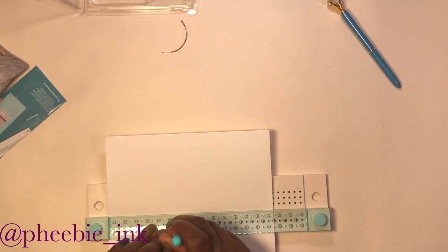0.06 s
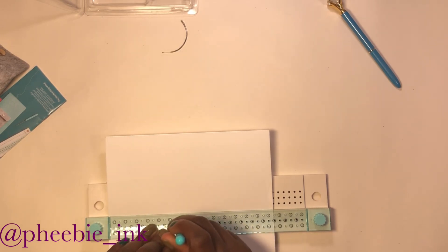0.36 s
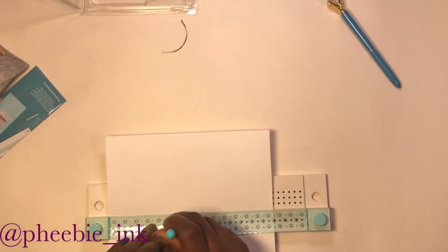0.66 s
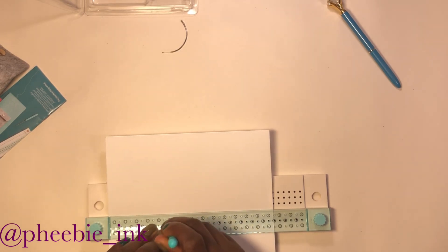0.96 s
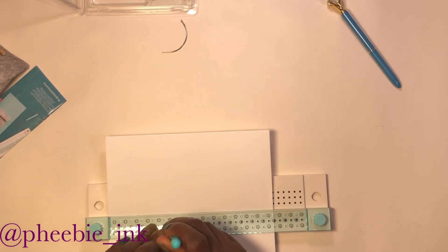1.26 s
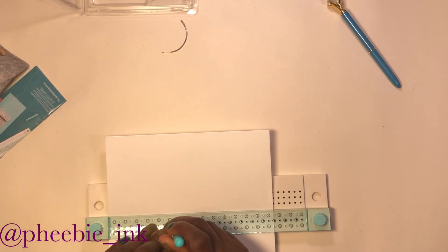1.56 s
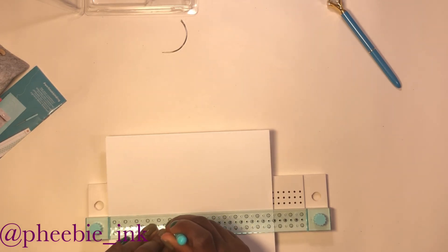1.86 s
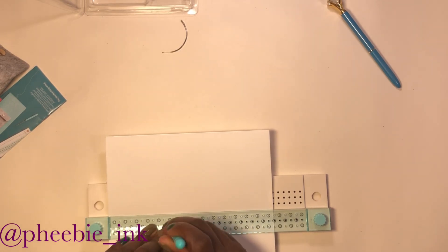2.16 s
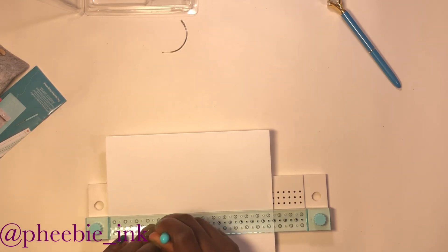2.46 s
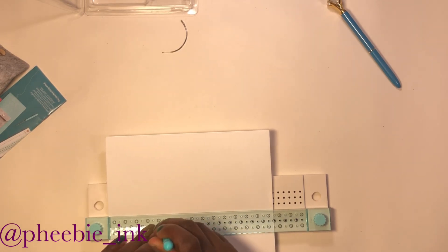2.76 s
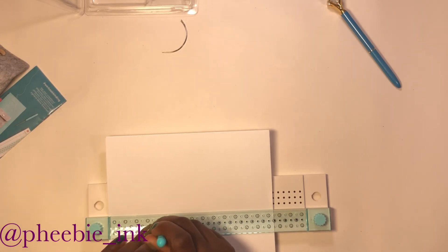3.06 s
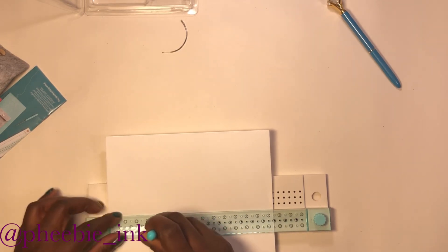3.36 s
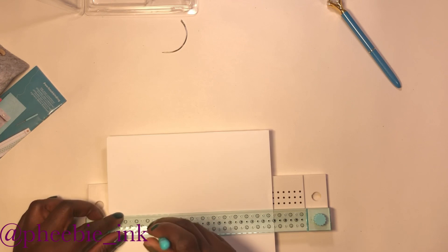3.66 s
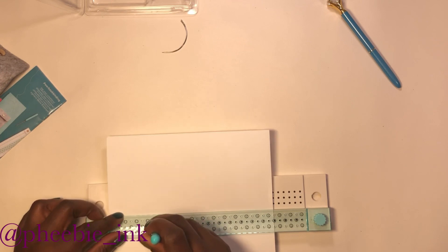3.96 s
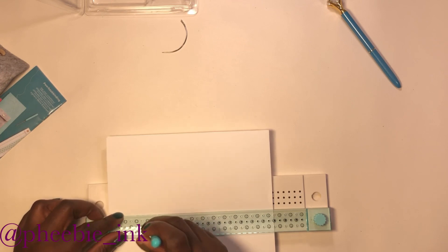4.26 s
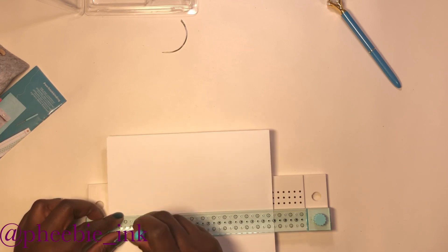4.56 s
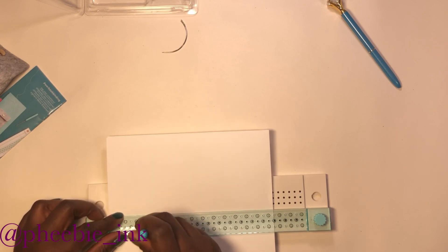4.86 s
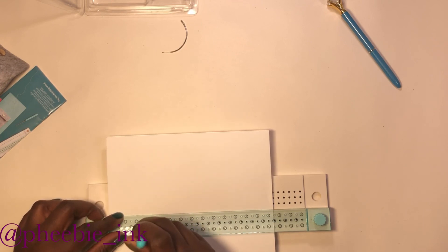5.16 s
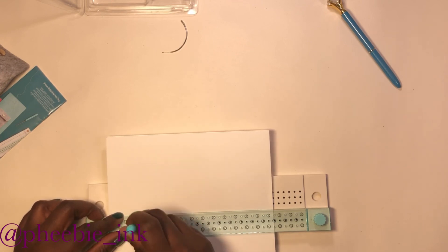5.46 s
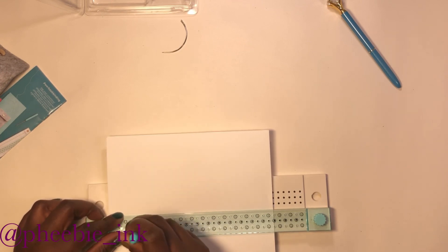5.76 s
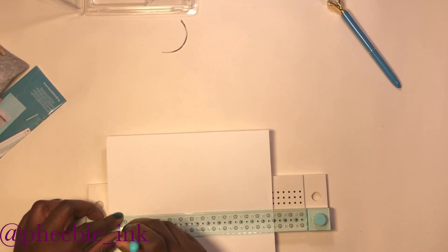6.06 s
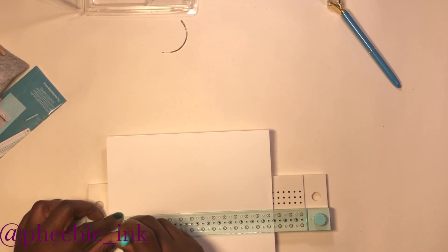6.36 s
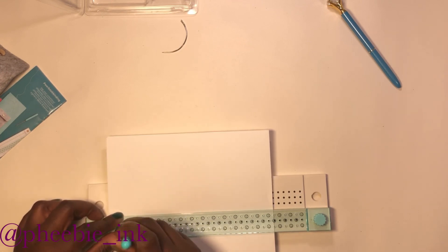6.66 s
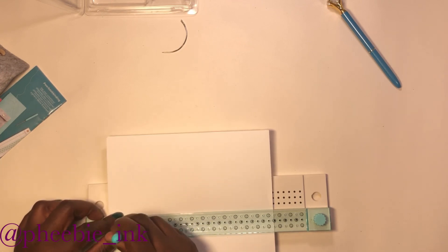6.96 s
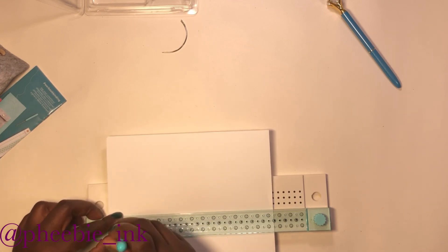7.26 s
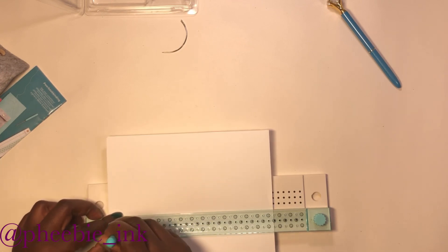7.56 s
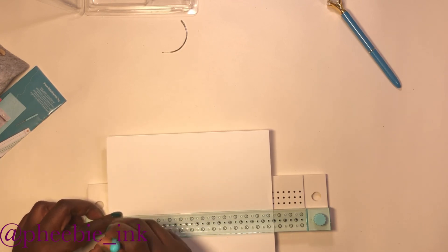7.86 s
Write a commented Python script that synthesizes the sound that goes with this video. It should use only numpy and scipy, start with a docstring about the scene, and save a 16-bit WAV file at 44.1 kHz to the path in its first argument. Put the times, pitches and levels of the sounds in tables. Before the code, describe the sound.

Close, dry clicks and quick paper crunches as an awl pierces sheets along a plastic hole guide, which sometimes slaps back down.

```python
"""Awl punching a paper stack

A table in a quiet room, heard close up on one microphone. An awl punches a row of holes, guided by a
plastic hole ruler. The steel point clacks into a guide hole, crunches through the sheets in two quick
pushes, thumps the table and rasps back out, or sticks and jerks free so that the ruler slaps down.
The hands shift softly over the paper."""
import sys
import numpy as np
from scipy import signal
from scipy.fft import rfft, irfft, next_fast_len
from scipy.io import wavfile
from scipy.ndimage import uniform_filter1d

SR = 44100
rng = np.random.default_rng(int(sys.argv[2]) if len(sys.argv) > 2 else 0)


def put_to_file(sound):
    """Save the sound as 16-bit audio at rate SR, in the file named by the first command-line argument."""
    columns = np.atleast_2d(sound).T  # one column per channel
    safe = np.clip(columns, -1, 1)
    whole_steps = np.round(safe * 32767)
    wavfile.write(sys.argv[1], SR, whole_steps.astype(np.int16))


N = 357651
STROKE = np.arange(-SR // 8, SR // 5) / SR  # time around the peak of one stroke, s
MIDDLING_KNOCK_DB = -38.5

# resonances of the plastic ruler: f/Hz, bandwidth/Hz, relative level/dB
RULER = [(570, 80, -13), (801, 76, -6), (1037, 78, -1.5), (1253, 129, 4.5), (1460, 156, 2),
         (1868, 70, -5.5), (2003, 160, -11), (2420, 240, -15.5), (2763, 180, -7), (3130, 860, -14),
         (3970, 1400, -20.5), (4700, 660, -23)]
# resonances of the punching board: f/Hz, bandwidth/Hz, relative level/dB
BOARD = [(61.7, 32, -5.5), (109.5, 6.9, 11), (150, 15.8, 1.5), (200.5, 62, -4.5), (256, 27, -1),
         (305, 19, 0.5), (387, 33, -6), (477, 94, -10), (606, 110, -10.5), (668, 66, -14.5)]
# crisp edge on the rasp of a withdrawing shaft: f/Hz, gain/dB
WITHDRAW_EDGE = [(11000, 0), (15000, 4.5)]


def from_db(db):
    """Decibels to gain."""
    return 10 ** (np.asarray(db) / 20)


def rms_one(x):
    """Scale to rms 1."""
    return x / np.sqrt(np.mean(x ** 2) + 1e-20)


def peak_one(x, size):
    """Scale so that the loudest stretch of size samples has rms 1."""
    return x / np.sqrt(uniform_filter1d(x ** 2, size).max() + 1e-20)


def add(out, s, sound):
    """Mix in a stroke with its time zero at s seconds."""
    start = round((s + STROKE[0]) * SR)
    low, high = max(start, 0), min(start + len(sound), N)
    out[low:high] += sound[low - start:high - start]


def colour(x, spectrum):
    """Shape a signal by a curve through (f/Hz, gain/dB) points."""
    size = next_fast_len(len(x))
    hz, db = np.transpose(spectrum)
    gain = from_db(np.interp(np.log(np.fft.rfftfreq(size, 1 / SR) + 1), np.log(hz), db))
    return irfft(rfft(x, size) * gain, size)[:len(x)]


def resonate(x, modes, hollow_db=0, bright_db=0, spread_db=1.8):
    """Parallel resonances, weighted anew by each point of contact."""
    out = 0
    for k, (hz, width, db) in enumerate(modes):
        r = np.exp(-np.pi * width / SR)
        ringing = signal.lfilter([1, 0, -1], [1, -2 * r * np.cos(2 * np.pi * hz / SR), r * r], x)
        register_db = hollow_db * (hz < 1350) + bright_db * (hz > 2400)
        gain = (-1) ** k * from_db(db + register_db + spread_db * rng.standard_normal())
        out = out + gain * (1 - r * r) / 2 * ringing
    return out


def swell(width_s, steepness, fade_s=0.055, lead_s=0):
    """Contact force builds to a peak and lets go again."""
    t = STROKE + lead_s
    return (1 + (t / width_s) ** 2) ** -steepness * np.exp(-(t / fade_s) ** 2)


def slips(spread_db):
    """Dense tiny slips and fibre breaks of uneven size; rms 1."""
    noise, sizes = rng.standard_normal((2, len(STROKE)))
    return rms_one(noise * from_db(spread_db * sizes))


def room_tone(air_db=-69, whine_hz=1990, whine_db=-90.5):
    """Room air with a faint steady whine."""
    # spectrum of the air: f/Hz, relative level/dB
    air_spectrum = [(20, -31), (45, -14.5), (62, 3), (80, -7.5), (105, 0.5), (190, -9), (280, -3),
                    (430, -11), (850, -17), (1500, -19), (2200, -22.5), (5000, -25.5), (11000, -29),
                    (15500, -29)]
    air = from_db(air_db) * rms_one(colour(rng.standard_normal(N), air_spectrum))
    return air + from_db(whine_db) * np.sin(2 * np.pi * whine_hz * np.arange(N) / SR)


def sliding_hands():
    """Skin sticks and slides on the paper in a soft, uneven hiss."""
    # course of the sliding: t/s, level/dB
    effort = [(0, -70.5), (.15, -65.5), (.3, -77), (1.7, -81), (2.2, -72.5), (2.45, -62.5), (2.85, -67),
              (3.1, -69.5), (3.45, -65), (3.75, -62.5), (3.9, -75.5), (4.4, -76.5), (4.65, -70),
              (4.9, -71.5), (6.5, -81), (8.1, -73)]
    # spectrum of skin on paper: f/Hz, relative level/dB
    skin = [(200, 19.5), (500, 17), (1400, 11.5), (2400, 6.5), (3300, 5), (5000, 1), (9000, -4.5),
            (15500, -6)]
    grip_db = rms_one(uniform_filter1d(uniform_filter1d(rng.standard_normal(N), 1500), 1500))
    effort_db = np.interp(np.arange(N) / SR, *np.transpose(effort))
    return from_db(effort_db + grip_db) * rms_one(colour(rng.standard_normal(N), skin))


def crackle(spectrum, ripple_db=5.0, mode_spacing_hz=170):
    """Breaking fibres, coloured by the sheet's many modes, which differ from hole to hole; rms 1."""
    mode_db = ripple_db * np.clip(rng.standard_normal(128), -2, 2)
    mode_hz = mode_spacing_hz * (1 + np.arange(len(mode_db)))
    fibres = colour(slips(2.8), spectrum)
    return rms_one(colour(fibres, np.transpose([mode_hz, mode_db])))


def rip(width_s, paper_db, coarse_db, squeak_hz, ruler_db, board_db=-51.5, squeak_db=4.5):
    """Fibres break; the shaft squeaks in the hole, rubs the ruler and shakes the board."""
    # spectrum of tearing paper: f/Hz, relative level/dB
    tearing = [(600, 2), (1500, 6), (2300, -1), (2900, 3), (3600, 2), (4500, 7.5), (5800, 3), (7500, 0.5),
               (11000, -1.5), (13000, -3), (14500, -1.5)]
    # spectrum of the shaft's friction on the ruler: f/Hz, relative level/dB
    rubbing = [(500, -15.5), (800, 1), (1150, -7), (1430, -1.5), (1750, -1), (3000, 0)]
    force = swell(width_s * 1.514, 1.424, fade_s=0.15)
    fibres = colour(crackle(tearing), [(3600, coarse_db), (6800, 0)])  # thick fibres crack lower
    fibres = colour(fibres, [(squeak_hz - 400, 0), (squeak_hz, squeak_db), (squeak_hz + 400, 0)])
    paper = from_db(paper_db) * fibres * force
    friction = colour(slips(2.2), rubbing) * force
    ruler = from_db(ruler_db) * peak_one(resonate(friction, RULER), size=700)
    board = from_db(board_db) * peak_one(resonate(slips(1.7) * force, BOARD), size=700)
    return paper + ruler + board


def thump(level_db, rise_s=0.0018, spread_db=2.5, detune=0.022, damp_s=0.33):
    """A soft push sets the low modes of the table swinging; the leaning hand detunes and damps them."""
    # modes of the table without the hand: f/Hz, relative level/dB, t60/s
    modes = [(31, -32.5, 0.29), (62, -12, 0.65), (108, 3.5, 0.27), (142.6, -14, 0.44), (216, -28.5, .2),
             (234.5, -12, 0.16), (298.5, -33.5, 0.25)]
    age = np.maximum(STROKE, 0)
    swing = 0
    for (hz, db, t60), (strength, load) in zip(modes, rng.standard_normal((len(modes), 2))):
        decay = from_db(db + spread_db * strength - 60 * age / t60)
        swing = swing + decay * np.sin(2 * np.pi * hz * (1 + detune * load) * age)
    envelope = (1 - np.exp(-(age / rise_s) ** 2)) * np.exp(-(age / damp_s) ** 2)
    return from_db(level_db) * peak_one(swing * envelope, size=400)


def drags(coarse_db=-1, squeak_hz=2800):
    """A loose awl rasps along the hole while the hand's weight shifts on the table."""
    # gentle drags of the shaft: t/s, width/s, paper/dB, ruler/dB, board and thump/dB, thump lag/s
    strokes = [(0.005, 0.013, -57.5, -50, -49, 0.004), (2.195, 0.015, -61, -58.5, -53, -0.021),
               (2.69, 0.012, -60, -57.5, -48, -0.021), (3.03, 0.01, -55, -51, -53, 0.02),
               (3.311, 0.011, -66, -56.5, -63, -0.008), (5.58, 0.011, -52, -45.5, -50, -0.002),
               (6.142, 0.011, -58, -55, -59, -0.0093), (7.248, 0.014, -57.5, -53.5, -52, -0.01),
               (7.595, 0.0069, -62, -48.5, -44.5, 0.015), (7.916, 0.012, -62.5, -55.5, -48.5, 0.002)]
    out = np.zeros(N)
    for s, width_s, paper_db, ruler_db, thump_db, lag_s in strokes:
        rasp = rip(width_s, paper_db, coarse_db, squeak_hz, ruler_db, board_db=thump_db)
        add(out, s, colour(rasp, WITHDRAW_EDGE))
        add(out, s + lag_s, thump(thump_db))
    return out


def brushes(width_s=0.01, skirt_db=-17):
    """Fingertips brush the paper and the ruler: short, faint runs of slips, each around one pitch."""
    # fingertip touches: t/s, level/dB, f/Hz
    touches = [(0.056, -60.5, 5570), (0.098, -71, 10500), (2.474, -56.5, 1690), (3.469, -64.5, 2560),
               (3.518, -71, 5060), (3.71, -58.5, 452), (3.78, -58, 2240), (3.949, -63, 1850),
               (4.435, -63.5, 2900), (6.27, -65.5, 800)]
    out = np.zeros(N)
    for s, db, hz in touches:
        hump = [(hz / 10, 2 * skirt_db), (hz / 2, skirt_db), (hz, 0),
                (hz * 2, skirt_db), (hz * 10, 2 * skirt_db)]
        scrape = rms_one(colour(slips(3.6), hump))
        add(out, s, from_db(db) * scrape * swell(width_s, 0.77))
    return out


def clack(width_s, ruler_db, hollow_db, bright_db, nick_db, board_db, snap_lead_s=0.0035):
    """The point scuffs over the rim of a guide hole, snaps past it and nicks the top sheet."""
    # spectrum of the nicked sheet: f/Hz, relative level/dB
    nick = [(600, -7.5), (2500, 9.5), (4500, 3.5), (6000, -3), (7500, -1), (11000, -4), (13500, -5)]
    snap = np.arange(len(STROKE)) == np.searchsorted(STROKE, -snap_lead_s)
    scuff = 0.32 * slips(2.55) * swell(width_s * 0.73, 0.63, fade_s=0.053, lead_s=0.0018)
    push = slips(2) * swell(width_s * 1.5, 0.62, lead_s=0.0012)
    bite = swell(width_s + 0.0044, 0.6, fade_s=0.064, lead_s=-0.0028)
    ruler = from_db(ruler_db) * peak_one(resonate(snap + scuff, RULER, hollow_db, bright_db), size=176)
    board = from_db(board_db) * peak_one(resonate(push, BOARD), size=700)
    paper = from_db(nick_db) * crackle(nick, ripple_db=2.5) * bite
    return ruler + board + paper


def taps(middling_width_s=0.0041, halving_db=24, bright_db=-1.5):
    """The point knocks on the ruler, feeling for the next guide hole, and now and then a finger bumps it; a
    harder knock is shorter."""
    # knocks on the ruler, by the point except the faint hollow ones at 1.32, 1.924 and 2.827 s, which are
    # finger bumps: t/s, ruler/dB, hollowness/dB, nick in the top sheet/dB
    knocks = [(0.235, -37.5, -4, -61), (0.48, -61, 0, -78), (0.52, -63.5, -5, -84), (1.03, -37.5, -5, -66),
              (1.091, -50, -1.5, -64), (1.32, -66.5, 5, -92), (1.412, -37.5, -2.5, -61),
              (1.812, -48.5, 1.5, -62), (1.924, -62.5, 10, -77), (2.356, -45.5, 0, -77),
              (2.42, -54, 15, -81), (2.827, -67.5, 12, -75), (2.954, -41, 2, -66), (3.706, -62.5, 2, -88),
              (4.434, -61, -1.5, -77), (5.181, -39, -0.5, -79), (5.303, -58.5, -2, -86.5),
              (6.347, -48.5, -2.5, -67), (6.914, -39, -4.5, -63.5), (7.498, -37, -2.5, -69)]
    out = np.zeros(N)
    for s, ruler_db, hollow_db, nick_db in knocks:
        excess_db = ruler_db - MIDDLING_KNOCK_DB
        width_s = middling_width_s * 2 ** (-excess_db / halving_db)
        board_db = -54 + 0.36 * excess_db  # the board follows the knock only in part
        add(out, s, clack(width_s, ruler_db, hollow_db, bright_db, nick_db, board_db))
    return out


def pierces(first_squeak_hz=3200, thump_lag_s=0.007):
    """Two pushes take the awl through the sheets; the first is coarser, the second lands on the table."""
    # holes: first push t/s, second push t/s, first crackle/dB, second crackle/dB,
    # coarseness/dB, second squeak f/Hz, ruler base level/dB, thump/dB
    holes = [(0.62, 0.65, -48.5, -47.5, 1.5, 5860, -51.5, -48),
             (2.031, 2.069, -48, -45, -1.5, 5700, -51, -49),
             (2.511, 2.546, -51, -45, 1.5, 4200, -50, -52.5),
             (3.194, 3.246, -51, -47.5, 4, 2800, -54.5, -59),
             (4.072, 4.104, -48, -45.5, 6, 3930, -50.5, -44.5),
             (4.583, 4.802, -49.5, -45, 5, 4150, -52, -47),
             (5.422, 5.445, -49.5, -45.5, 3, 3460, -47.5, -48.5),
             (5.955, 5.98, -49.5, -44.5, 2.5, 2820, -45.5, -43.5),
             (6.46, 6.494, -50.5, -46, 2.5, 5100, -48, -44.5),
             (7.038, 7.058, -49.5, -44, 1, 5100, -46, -42), (7.716, 7.75, -51, -46, -0.5, 5100, -48.5, -52)]
    out = np.zeros(N)
    for first_s, second_s, first_db, second_db, coarse_db, squeak_hz, ruler_db, thump_db in holes:
        add(out, first_s, rip(0.0096, first_db, coarse_db + 2, first_squeak_hz, ruler_db + 1))
        add(out, second_s, rip(0.01, second_db, coarse_db, squeak_hz, ruler_db + 0.5))
        add(out, second_s + thump_lag_s, thump(thump_db))
    return out


def slaps(clack_width_s=0.0028, clap_width_s=0.0096, clap_re_ruler_db=-5.5, thump_lag_s=0.009):
    """A stuck awl lifts the stack, which drops back with the ruler as the point comes free."""
    # the awl jerks free: t/s, ruler/dB, hollowness/dB, brightness/dB, torn rim/dB, thump/dB
    jerks = [(0.794, -37, 0, -27, -56.5, -50), (3.592, -29.5, 13, -2, -44.5, -42),
             (4.219, -24, -0.5, 1.5, -43, -47), (4.977, -27.5, -5, 2.5, -46.5, -47),
             (6.121, -40, 8, -5, -52.5, -54), (6.629, -36.5, -0.5, -0.5, -52.5, -48)]
    # spectrum of the sheets clapping together under the ruler: f/Hz, relative level/dB
    sheets = [(250, -22.5), (500, -4), (850, 0.5), (1400, -0.5), (1950, -2), (2400, -16), (3200, -15),
              (6000, -28.5)]
    out = np.zeros(N)
    for s, ruler_db, hollow_db, bright_db, rim_db, thump_db in jerks:
        board_db = -46 + 0.15 * (ruler_db - MIDDLING_KNOCK_DB)
        slap = clack(clack_width_s, ruler_db, hollow_db, bright_db, rim_db, board_db)
        clap = peak_one(colour(slips(5.3), sheets) * swell(clap_width_s, 1.6), size=300)
        add(out, s, colour(slap, WITHDRAW_EDGE))
        add(out, s, from_db(ruler_db + clap_re_ruler_db) * clap)
        add(out, s + thump_lag_s, thump(thump_db))
    return out


def room_tail(x, level_db=-19, t60_s=0.12, delay_s=0.006, cutoff_hz=5100):
    """A short diffuse tail, dulled by the furnishings."""
    age = np.arange(SR // 2) / SR
    lowpass = signal.butter(2, cutoff_hz, "low", fs=SR, output="sos")
    reflections = signal.sosfilt(lowpass, rng.standard_normal(len(age)))
    tail = reflections * from_db(-60 * age / t60_s) * (age > delay_s)
    return from_db(level_db) * signal.fftconvolve(x, tail / np.sqrt(np.sum(tail ** 2)))[:N]


def scene():
    """The work at the table, close and nearly dry, over the room tone; mono."""
    work = taps() + pierces() + slaps() + drags() + brushes()
    return (work + room_tail(work) + room_tone() + sliding_hands())[None]


def record(dry, cutoff_hz=15750):
    """The microphone lifts the highest treble, then the top is cut steeply."""
    # treble lift of the microphone: f/Hz, gain/dB
    treble_lift = [(12500, 0), (15300, 3)]
    lowpass = signal.ellip(12, .1, 80, cutoff_hz, fs=SR, output="sos")
    return signal.sosfilt(lowpass, colour(dry[0], treble_lift))[None]


dry = scene()
out = record(dry)
put_to_file(out)
```